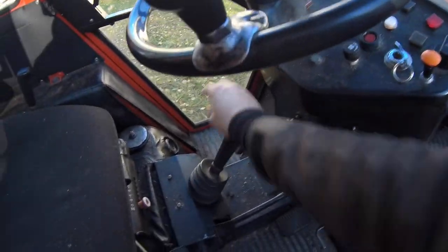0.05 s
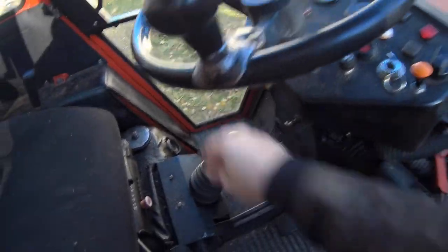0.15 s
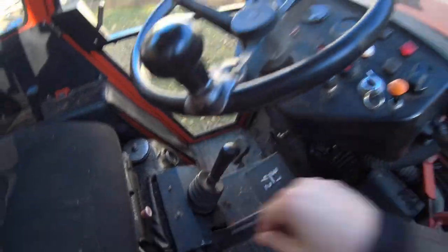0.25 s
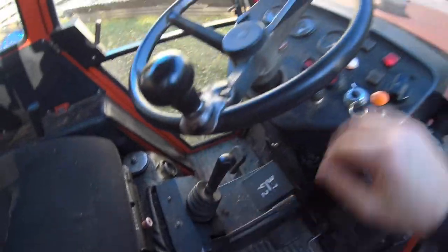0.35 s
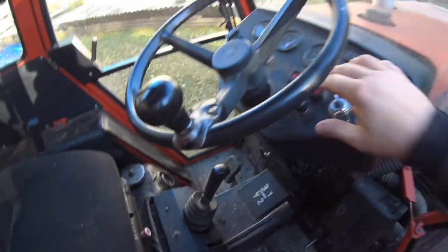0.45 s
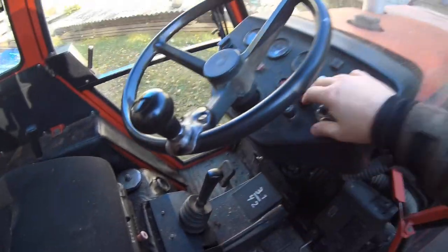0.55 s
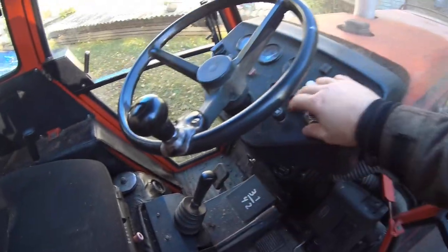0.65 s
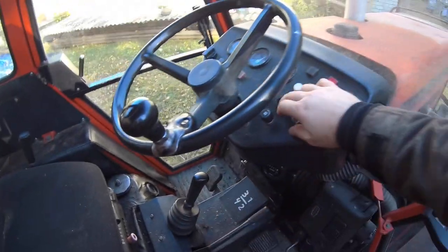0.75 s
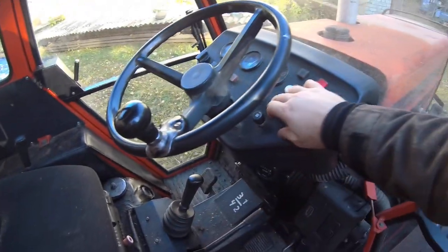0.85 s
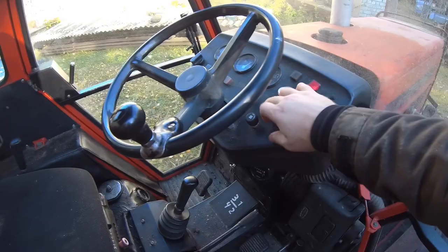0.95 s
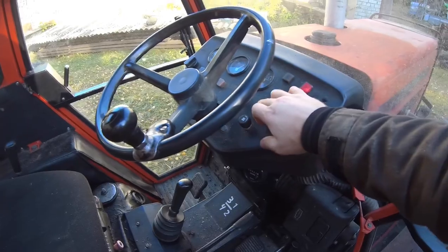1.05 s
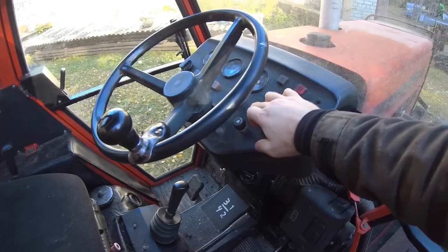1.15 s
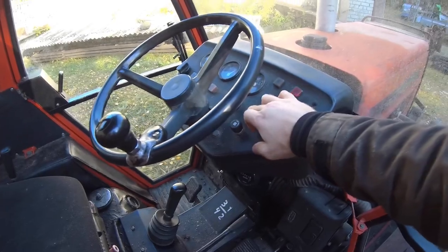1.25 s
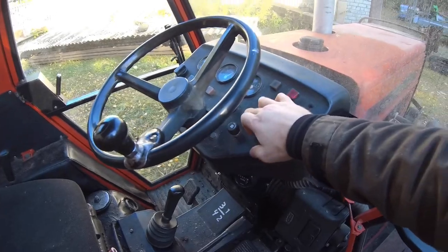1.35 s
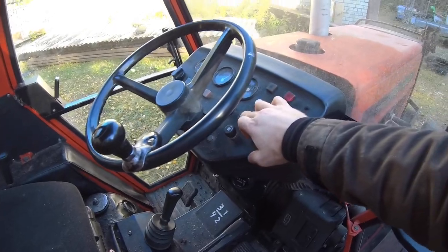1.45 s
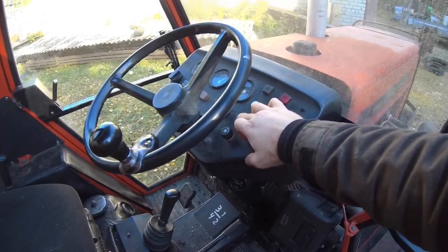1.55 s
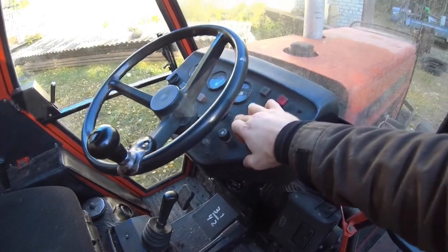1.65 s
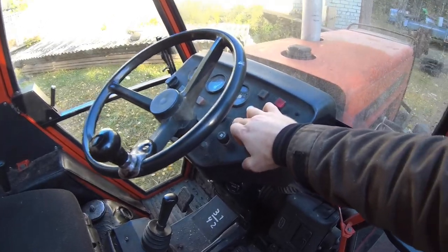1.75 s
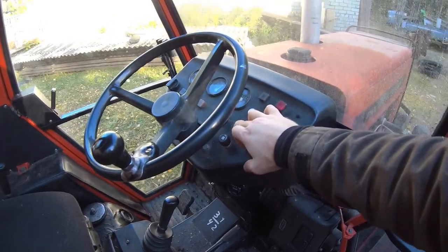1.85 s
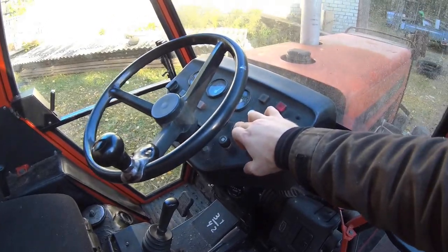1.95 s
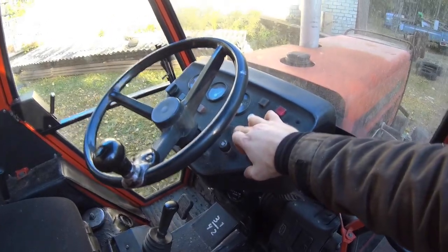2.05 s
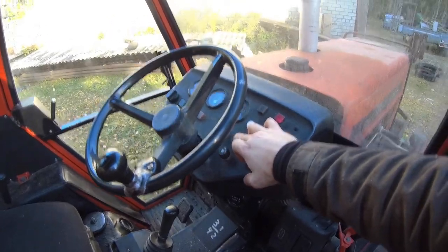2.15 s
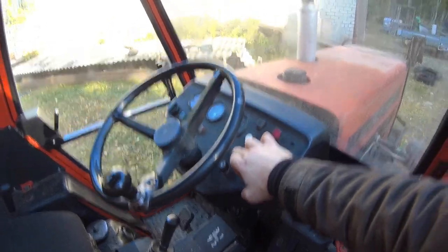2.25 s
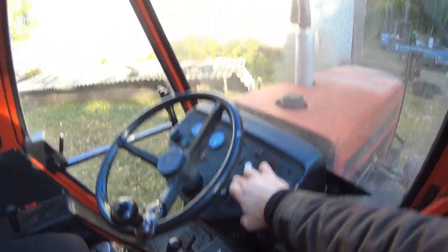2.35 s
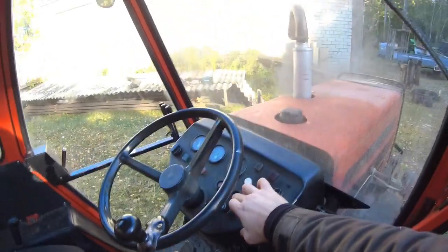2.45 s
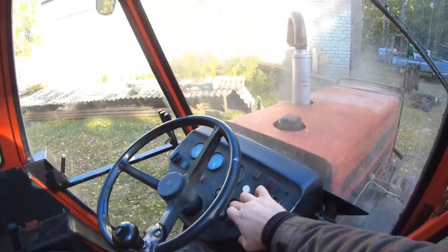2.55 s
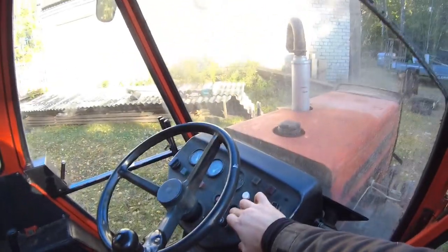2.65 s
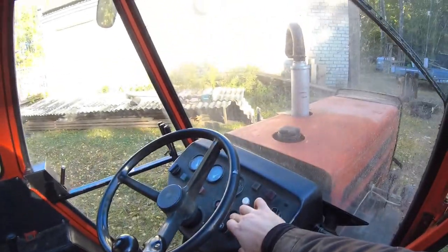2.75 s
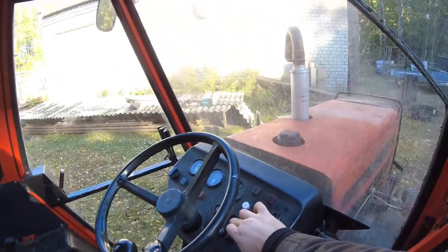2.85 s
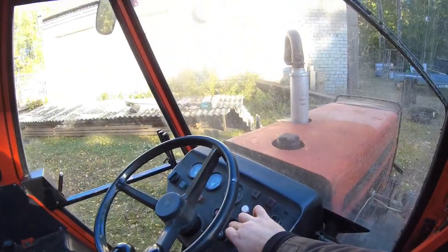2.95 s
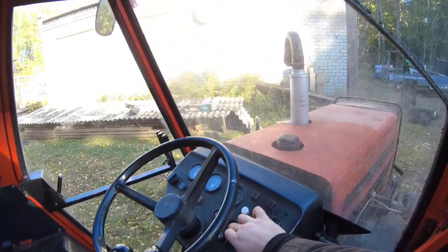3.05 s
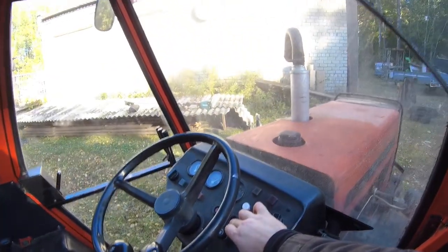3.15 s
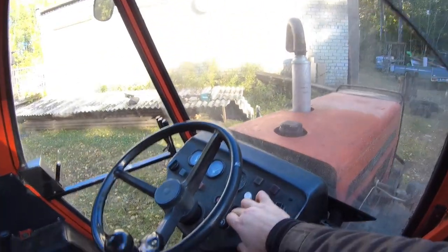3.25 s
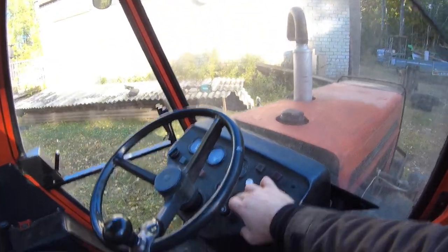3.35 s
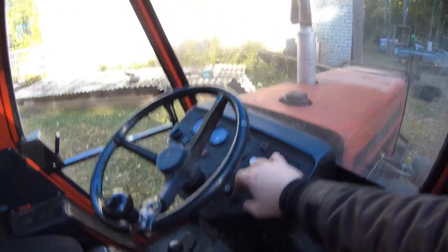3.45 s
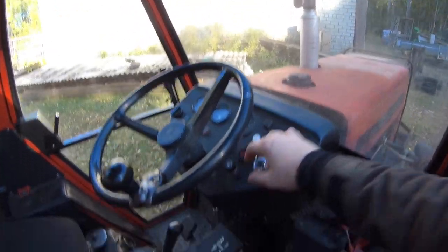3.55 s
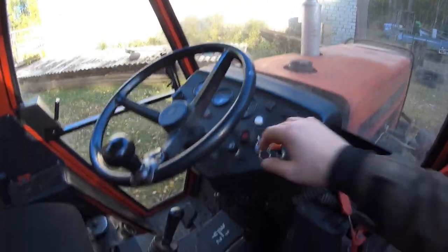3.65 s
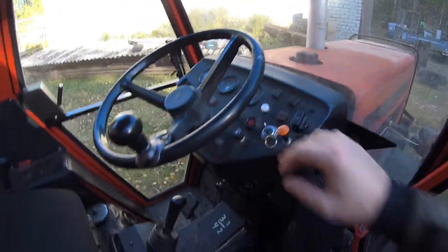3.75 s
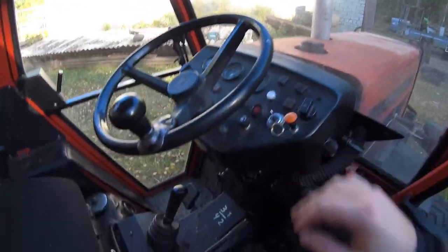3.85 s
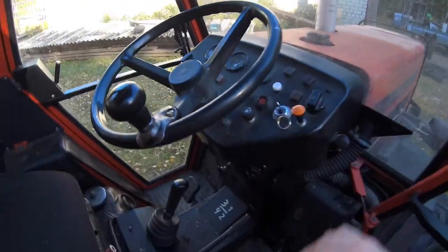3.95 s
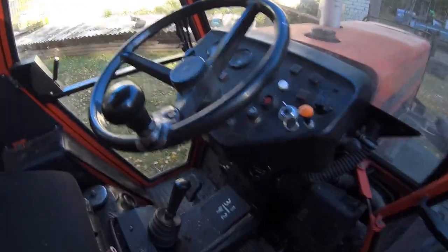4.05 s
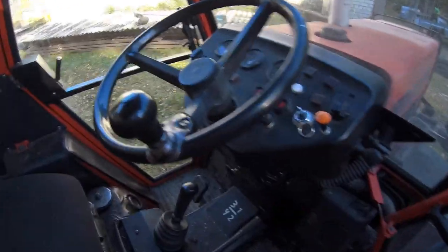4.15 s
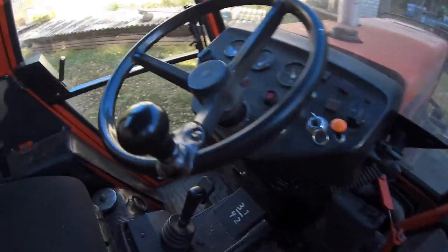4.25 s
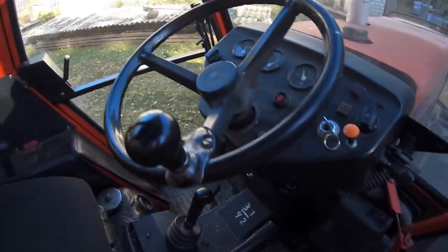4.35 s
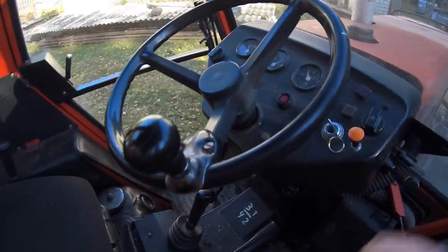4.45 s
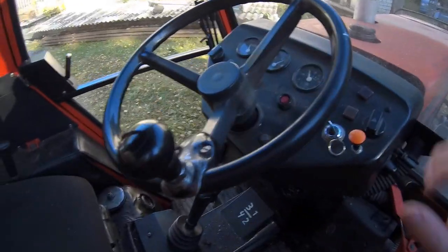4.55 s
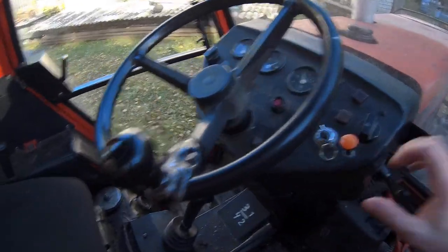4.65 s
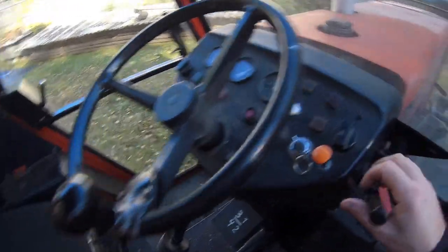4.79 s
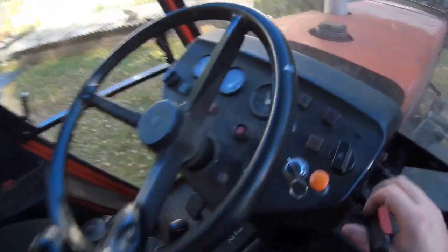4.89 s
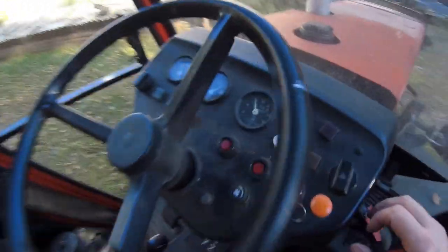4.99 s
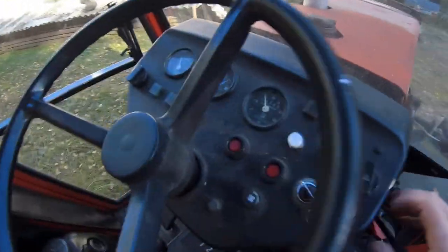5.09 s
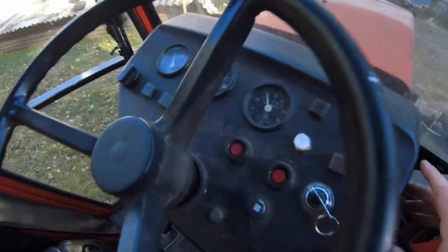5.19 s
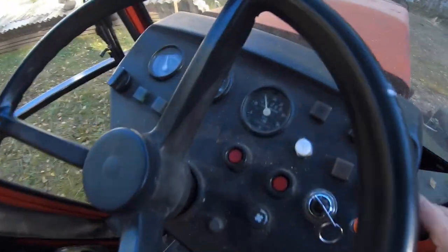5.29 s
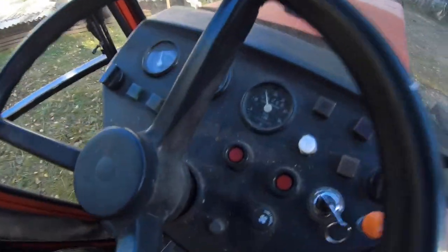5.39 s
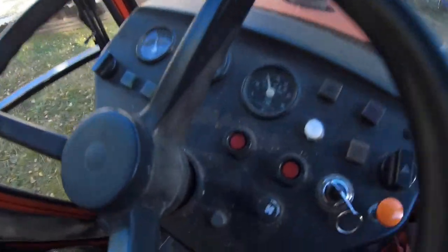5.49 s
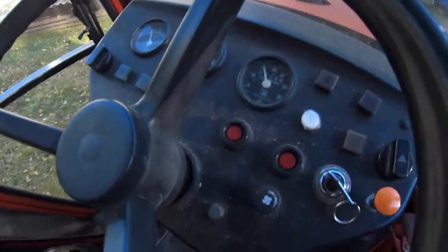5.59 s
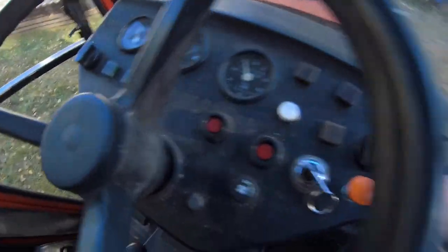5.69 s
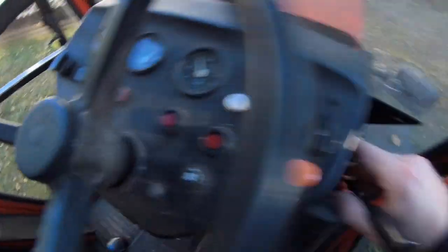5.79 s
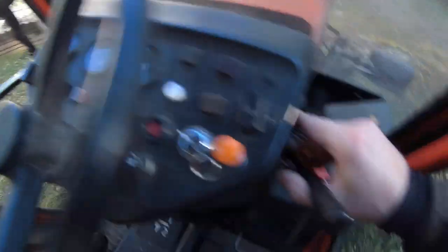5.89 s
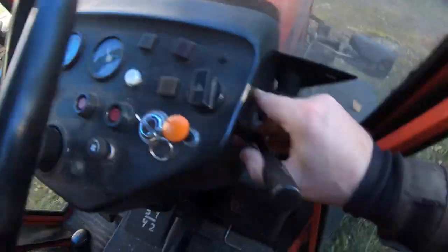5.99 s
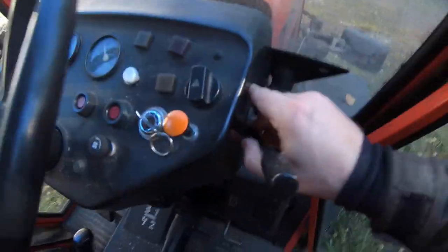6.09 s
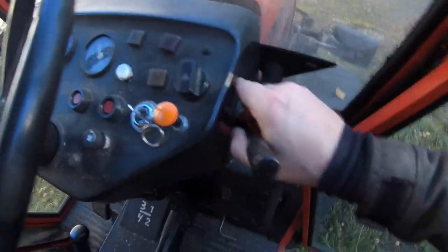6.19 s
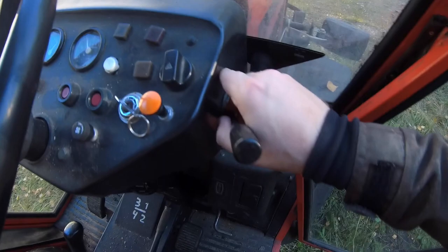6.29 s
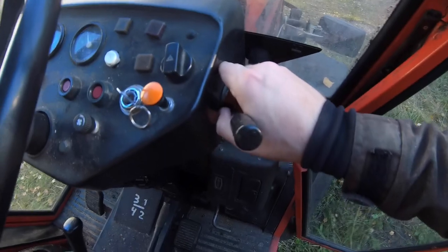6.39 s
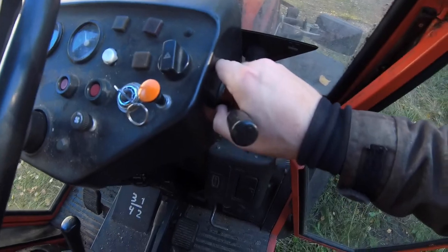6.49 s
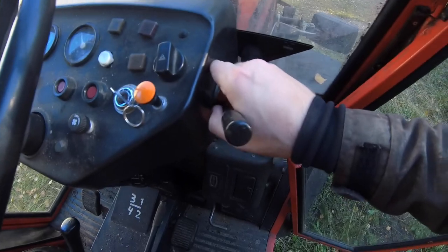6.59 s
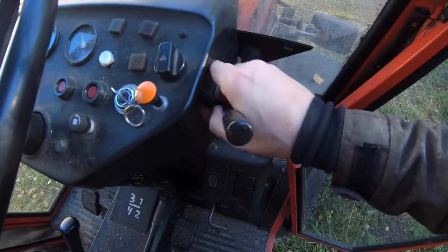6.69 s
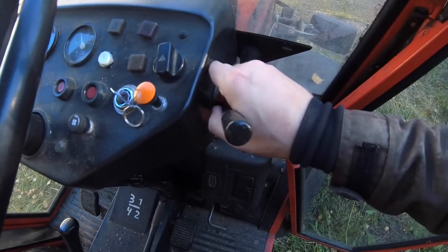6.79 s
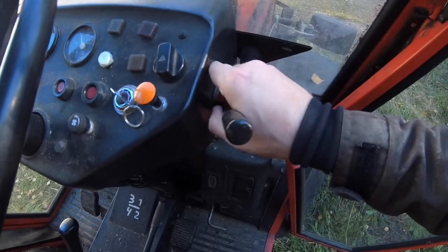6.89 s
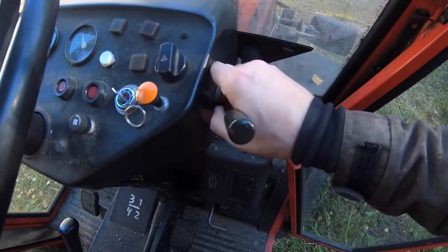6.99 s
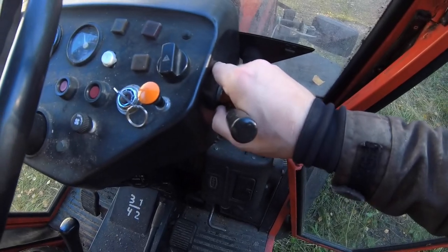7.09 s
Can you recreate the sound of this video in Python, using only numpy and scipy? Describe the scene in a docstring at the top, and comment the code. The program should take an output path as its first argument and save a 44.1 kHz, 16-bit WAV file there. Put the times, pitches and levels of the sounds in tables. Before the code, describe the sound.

A quiet cab with sleeve rustle and small switch clicks gives way to a bright metal clank and rough, pulsing starter grind. Low booms quicken as a three-cylinder diesel fires, very loud and slightly overloaded at the close stereo microphone. Loose panels jolt and gears skid; then the engine settles into a fast, even clatter, hissing and buzzing as a panel sings more strongly.

```python
"""A three-cylinder diesel catches and races up in a small tractor's cab, then settles at a fast governed speed.
The exhaust is a sum of lines locked to the engine cycle; thuds, knock and clatter are noise bursts at each firing,
over a hiss that puffs once a cycle. Before it a hand works the controls, the pinion crashes in and gear-tooth noise
cranks the engine while each stroke booms in the cab. Panels rattle and sing close to the stereo microphone."""
import sys
import numpy as np
from scipy.fft import rfft, irfft, next_fast_len
from scipy.io import wavfile
from scipy.ndimage import map_coordinates

SR = 44100
rng = np.random.default_rng(int(sys.argv[2]) if len(sys.argv) > 2 else 0)


def wrap_up_sound(samples):
    """Save the sound to the file named by the first command line argument, as 16-bit audio."""
    columns = np.atleast_2d(samples).T
    # keep every value between -1 and 1, then stretch to whole-number steps
    tamed = np.clip(columns, -1, 1)
    steps = np.round(tamed * 32767).astype(np.int16)
    wavfile.write(sys.argv[1], SR, steps)


N = 314433
T = np.arange(N) / SR  # s
TOP_HZ = 15780  # upper limit of the final band


def amp(db):
    """Decibels to gain."""
    return 10 ** (np.asarray(db) / 20)


def unit(x):
    """Each row scaled to rms 1."""
    return x / np.sqrt(np.mean(x ** 2, axis=-1, keepdims=True) + 1e-20)


def along(points, hz):
    """Interpolate (Hz, value) points on a log frequency axis."""
    f, v = np.transpose(points)
    return np.interp(np.log(hz + 1), np.log(f + 1), v)


def curve(rows):
    """Interpolate (time, value) rows to one value per sample."""
    s, values = np.transpose(rows)
    return np.interp(T, s, values)


def ramp(start, length):
    """A fade from 0 to 1, in seconds."""
    return np.clip((T - start) / length, 0, 1)


def wobble(rate):
    """A smooth random curve with rate knots a second."""
    knots = rng.standard_normal(int(N * rate / SR) + 4)
    return map_coordinates(knots, [T * rate], order=2)


def noise(length=N):
    """White noise, independent in the middle and side channels."""
    return rng.standard_normal((2, length))


def filtered(x, response):
    """Multiply the spectrum of x by a response of frequency."""
    n = x.shape[-1]
    m = next_fast_len(n + 4096)
    return irfft(rfft(x, m) * response(np.fft.rfftfreq(m, 1 / SR)), m)[..., :n]


def band(x, spectrum, lo_hz, hi_hz):
    """Colour x by a spectrum between two steep edges, at rms 1."""
    def response(hz):
        low_edge = 1 + (lo_hz / (hz + 1)) ** 12
        high_edge = 1 + (hz / hi_hz) ** 12
        return amp(along(spectrum, hz)) * (low_edge * high_edge) ** -.5
    return unit(filtered(x, response))


def add(track, s, sound):
    """Mix a sound into a track from time s."""
    i = max(round(s * SR), 0)
    track[..., i:i + sound.shape[-1]] += sound[..., :max(N - i, 0)]


# Still cab colour: pitch_hz, level_db (relative)
STILL_SPECTRUM = [(15, -37), (25, -6), (59, 2.5), (119, -11), (268, -6), (651, -13), (725, -8), (807, -15),
                  (923, -12), (1280, -15), (1630, -14), (2020, -19), (15600, -28.5)]
RUMBLE_DB, RUSTLE_DB = -52, -51.5
HANDLING_DB, SETTLE_S = 22.5, 0.16  # extra as the arm leaves the lever, and its decay time


def cab():
    """Handling rumble and a rustling sleeve, as shaped noise, settle in the still cab."""
    handling_db = HANDLING_DB * np.exp(-T / SETTLE_S)
    rumble = band(noise(), STILL_SPECTRUM, 25, 440)
    rustle = band(noise(), STILL_SPECTRUM, 410, 19000)
    rustle_db = RUSTLE_DB + .15 * handling_db + wobble(39.6)
    return amp(RUMBLE_DB + handling_db) * rumble + amp(rustle_db) * rustle


def booms(rows):
    """Each shove makes a low tone of the cab's air swell and die away."""
    out = np.zeros(N)
    for s, db, hz, length in rows:
        t = np.arange(int(length * SR)) / SR
        swell = np.sin(np.pi * (t / length) ** 0.5) ** 2
        add(out, s, amp(db) * swell * np.sin(2 * np.pi * hz * t))
    return out


# Soft bumps of the arm: start_s, level_db, pitch_hz, length_s
ARM_BUMPS = [(0.0, -29, 67, 0.044), (0.06, -41, 62, .04), (0.464, -36, 52, 0.041), (0.527, -36, 55, 0.03),
             (.655, -45, 70, .05)]


def arm_bumps():
    """The arm nudges the cab into short, soft low tones."""
    return booms(ARM_BUMPS)


def scrapes(rows, spectrum, lo_hz):
    """Bright rubbing noises that swell quickly and fade."""
    out = np.zeros((2, N))
    for s, db, length in rows:
        u = np.arange(int(length * SR)) / int(length * SR)
        scrape = band(noise(SR), spectrum, lo_hz, TOP_HZ)[:, :len(u)]
        add(out, s, amp(db) * np.sin(np.pi * u ** 0.52) * scrape)
    return out


# Sleeve sliding over the dash: start_s, level_db, length_s
SLEEVE_SWISHES = [(.34, -55, .2), (.56, -55, 0.16)]


def sleeve():
    """Cloth slides over the dash as short strokes of filtered noise."""
    return scrapes(SLEEVE_SWISHES, STILL_SPECTRUM, lo_hz=2800)


# Bright snap of metal contacts: pitch_hz, level_db (relative)
PINION_SPECTRUM = [(59, -49), (100, -5.5), (421, -13), (498, 1), (729, -7), (940, -2.5), (3630, -13.5),
                   (5550, -12), (7150, -21.5), (10000, -18), (15600, -24)]


def hits(rows, ring_spectrum, rise, t60, knock_db, ring_db, snap_db, snap_top_hz):
    """Contacts mix a dull knock, a ring and a bright snap; brightness trades knock for snap."""
    out = np.zeros((2, N))
    t = np.arange(SR // 4) / SR
    envelope = amp(-60 * t / t60) * (1 - np.exp(-t / rise))
    for s, db, bright_db in rows:
        knock = amp(knock_db - .35 * bright_db) * band(noise(len(t)), ring_spectrum, 190, 480)
        ring = amp(ring_db) * band(noise(len(t)), ring_spectrum, 610, 2300)
        snap = amp(snap_db + bright_db) * band(noise(len(t)), PINION_SPECTRUM, 2340, snap_top_hz)
        add(out, s, amp(db) * (knock + ring + snap) * envelope)
    return out


# Lever and switches: start_s, level_db, brightness_db
CONTROL_CLICKS = [(0.004, -32.5, 4), (0.038, -43, -3), (0.117, -40.5, 5), (0.626, -47, 0),
                  (0.764, -33.5, -12)]
# Dash ring: pitch_hz, level_db (relative)
DASH_SPECTRUM = [(120, -55), (200, -21), (389, -21), (438, -34), (554, -4), (938, -4), (1240, -7),
                 (1320, -26), (1410, -4), (1640, -4), (2010, -15), (2600, -26), (3380, -52), (5720, -120)]


def controls():
    """The lever and switches click, ringing the dash."""
    return hits(CONTROL_CLICKS, DASH_SPECTRUM, rise=0.00064, t60=0.085,
                knock_db=-11, ring_db=5, snap_db=-4, snap_top_hz=9350)


def key():
    """Two high partials ping thinly as the ignition key is turned."""
    out = np.zeros((2, N))
    t = np.arange(SR // 6) / SR
    long_partial = np.sin(2 * np.pi * 7850 * t)
    short_partial = np.sin(2 * np.pi * 8300 * t) * np.exp(-t / .01)
    add(out, 1.069, amp(-47 - 60 * t / .13) * (long_partial + short_partial))
    return out


# Pinion against the ring gear: start_s, level_db, brightness_db
PINION_HITS = [(1.08, -40.5, -26), (1.097, -36, 0), (1.107, -33, 4), (1.117, -26, 5.5), (1.134, -22, -0.5),
               (1.143, -24.5, -13), (2.007, -30, 0), (2.015, -27.5, -22)]


def pinion():
    """The solenoid pulls in and the pinion strikes the ring gear with bright metal contacts."""
    return hits(PINION_HITS, PINION_SPECTRUM, rise=0.0016, t60=0.092,
                knock_db=-1, ring_db=4.5, snap_db=3.0, snap_top_hz=16000)


# Slow first strokes that shake the cab: start_s, level_db, pitch_hz, length_s
STROKES = [(1.173, -19, 61.7, 0.1), (1.48, -19, 59.5, 0.15), (1.682, -19.5, 58, 0.17),
           (1.89, -21.5, 59, 0.14), (2.028, -13, 59.7, 0.15), (2.136, -6.5, 61, 0.13),
           (2.207, -3, 60.2, 0.2), (2.328, -2, 66, 0.3)]
CRANK_STROKES = 4
LAST_STROKE_S = .23  # the stroke in which the engine catches


def stroke_booms():
    """Slow compressions shove the cab's air into low booms."""
    return booms(STROKES)


def stroke_starts():
    """Start times of the cranking strokes, then the end of the last one."""
    starts = [row[0] for row in STROKES[:CRANK_STROKES]]
    return np.array(starts + [starts[-1] + LAST_STROKE_S])


def surge(stroke, depth, peak):
    """A gain that swells and sags once a stroke; peak is a share of the stroke."""
    return 1 + np.clip(depth, 0, 1) * np.cos(2 * np.pi * (stroke - peak))


# Starter colour: pitch_hz, level_db (relative)
STARTER_SPECTRUM = [(59, -44), (100, 17), (253, -2.5), (395, 9), (430, 3.5), (603, 7.5), (882, 5.5),
                    (960, -10), (1240, 2.5), (2140, -17.5), (3270, -25.5), (5430, -22.5), (7610, -35),
                    (11900, -37.5), (15600, -43)]
# Starter and bell housing resonances: pitch_hz, width_hz, level_db (relative)
HOUSING = [(259, 73, -1), (966, 64, 3), (1694, 64, -9.5), (2125, 37, -3)]
GROWL_DB, GROWL_SURGE, GROWL_PEAK = -30, 0.35, 0.21  # level, depth (0-1), share of stroke
RASP_DB, RASP_SURGE, RASP_PEAK = -42.5, 0.23, .06  # the same three; level at the first stroke
RASP_DB_PER_S = 7


def housing_response(f):
    """Sum the housing's resonances with alternating sign."""
    total = 0
    for k, (center, width, db) in enumerate(HOUSING):
        damping = 1j * f * width
        total = total + (-1) ** k * amp(db) * damping / (center * center - f * f + damping)
    return total


def starter():
    """Gear teeth grind and whine through the housing, their rate and strain varying once a stroke."""
    starts = stroke_starts()
    stroke = np.interp(T, starts, np.arange(len(starts)))
    growl_gain = amp(GROWL_DB) * surge(stroke, GROWL_SURGE, GROWL_PEAK)
    rasp_gain = amp(RASP_DB + RASP_DB_PER_S * (T - starts[0])) * surge(stroke, RASP_SURGE, RASP_PEAK)
    tooth_rate = 330 * (1 + .16 * np.cos(2 * np.pi * stroke) + .015 * wobble(40))
    teeth = np.cumsum(tooth_rate) / SR
    mesh = unit(np.exp(-(teeth % 1) / 0.88))
    grind = mesh * noise() + 0.23 * unit(np.diff(mesh, prepend=0))
    # teeth press hardest during compression
    strain_db = 3 * np.cos(2 * np.pi * (stroke - .25)) + 2 * wobble(18)
    ring = unit(amp(strain_db) * filtered(grind, housing_response))
    growl = amp(-4.5) * band(grind[::-1], STARTER_SPECTRUM, 155, 2100) + amp(-3.5) * ring
    whine = unit(sum(np.sin(2 * np.pi * k * teeth) / k for k in (8, 9, 11, 14)))
    rasp = band(grind, STARTER_SPECTRUM, 2080, 14500) + amp(-12) * whine
    shake = amp(-39) * band(noise(), STILL_SPECTRUM, 35, 86)
    cranking = ramp(1.135, 0.021) * (1 - ramp(2.107, 0.12))
    return cranking * (growl_gain * growl + rasp_gain * rasp + shake)


BACKLASH_AT, BACKLASH_DB = .74, -39  # share of the stroke, level


def backlash():
    """Past each compression the engine runs ahead of the starter and the gear teeth slap over."""
    starts = stroke_starts()[:-1]
    rows = [(s, BACKLASH_DB, 0) for s in starts[:-1] + BACKLASH_AT * np.diff(starts)]
    return hits(rows, STARTER_SPECTRUM, rise=.003, t60=0.23,
                knock_db=-11, ring_db=5, snap_db=0, snap_top_hz=13000)


# Overrun pinion skidding on the ring gear: start_s, level_db, length_s
PINION_SKIDS = [(2.244, -32, .09), (2.335, -26.5, 0.28), (2.767, -30.5, .15)]
# Treble of skids, valve gear and hiss: pitch_hz, level_db (relative)
CLATTER_SPECTRUM = [(1290, -33), (2200, 10), (2470, -4), (3290, -11), (4240, -11), (8580, -22),
                    (12200, -19), (14400, -24), (15600, -24)]


def skids():
    """The overrun pinion skids on the ring gear as bright rubbing noise."""
    return scrapes(PINION_SKIDS, CLATTER_SPECTRUM, lo_hz=4520)


# Body of the cab under light load: pitch_hz, level_db (relative)
BODY_SPECTRUM = [(110, -12), (200, -9.5), (235, -8.5), (270, 1), (335, 4.5), (370, -1), (420, -3.5),
                 (500, -6), (560, 0), (640, -6.5), (690, -11.5), (1000, 0)]
HUM_DB, HUM_RACING_DB = -19.5, 7  # level, and extra while the engine races
HUM_CALMS_AT, RELEASE_AT = 2.85, 3.6  # s; the key is let go at the second


def freewheel():
    """The overrun starter hums roughly, as narrow noise, and shakes the floor until released."""
    level_db = HUM_DB + HUM_RACING_DB * (1 - ramp(HUM_CALMS_AT, .07))
    hum = band(noise(), BODY_SPECTRUM, 243, 240)  # crossed edges leave a narrow band
    shake = band(noise(), BODY_SPECTRUM, 58, 63)
    shake = shake + amp(-3) * band(noise(), BODY_SPECTRUM, 94, 113)
    gate = ramp(2.49, 0.061) * (1 - ramp(RELEASE_AT, .08))
    return gate * amp(level_db) * (amp(-3.0) * hum + amp(-5.0) * shake)


# Loose panels jolted by hard firings: start_s, level_db, brightness_db
PANEL_RATTLES = [(2.088, -19, 10.5), (2.182, -15.5, 7), (2.207, -10.5, -6), (2.258, -21, 14),
                 (2.358, -11, 6), (2.38, -7.5, -1), (2.491, -7.5, 4), (2.548, -16, 0), (2.59, -12, -1),
                 (2.624, -9, 3), (2.704, -23, -6), (2.856, -10, -6)]
# Cab and engine under hard load: pitch_hz, level_db (relative)
RACING_SPECTRUM = [(71, -11), (120, -13.5), (184, 1.5), (232, -10), (274, -1.5), (375, -15), (419, -6.5),
                   (551, -9.5), (607, -9), (767, -8.5), (917, -6.5), (1220, -7), (1400, -14.5), (2370, -15),
                   (3200, -23), (4160, -57), (7040, -120)]


def rattles():
    """Hard firings jolt loose panels into short metal contacts."""
    return hits(PANEL_RATTLES, RACING_SPECTRUM, rise=0.00086, t60=0.092,
                knock_db=-3.5, ring_db=-2, snap_db=-17.5, snap_top_hz=9000)


# Engine speed once it runs: time_s, firings_per_s
SPEED = [(2.0, 8), (2.2, 13), (2.35, 20), (2.48, 27.5), (2.56, 30), (2.65, 34.6), (2.75, 37), (2.85, 38.1),
         (3.05, 37.59), (7.13, 37.59)]
FIRST_CYLINDER_AT = 3.030  # s, zero of the firing count


def firing_count():
    """Integrate speed to firings elapsed; three of them make one engine cycle."""
    count = np.cumsum(curve(SPEED)) / SR
    return count - np.interp(FIRST_CYLINDER_AT, T, count)


def firings(count):
    """Sample index and cylinder number (0-2) of each firing."""
    for i in np.flatnonzero(np.diff(np.floor(count))):
        yield i, int(np.floor(count[i + 1])) % 3


def blows(count, cylinder_db, lag, rise, t60, alike, bed_db, scatter_db):
    """One swelling, dying burst per firing over a steady bed; each cylinder repeats part of its own ring."""
    t = np.arange(SR // 12) / SR
    alike = np.clip(alike, 0, 1)
    own = rng.standard_normal((3, 2, len(t)))
    decay = amp(-60 * t / t60) * (1 - np.exp(-t / rise))
    out = np.zeros((2, N))
    for i, k in firings(count):
        ring = np.sqrt(alike) * own[k] + np.sqrt(1 - alike) * noise(len(t))
        add(out, T[i] + lag, amp(cylinder_db[k] + scatter_db * rng.normal()) * decay * ring)
    return unit(out) + amp(bed_db) * noise()


# Singing panel: time_s, level_db (before the mix of line and shaking)
PANEL_LEVEL = [(2.7, -27), (3.8, -25.5), (4.45, -20.5), (5.0, -17.5), (5.45, -18.5), (5.92, -19.5),
               (6.1, -21.5), (7.13, -20)]


def panel(count):
    """Every firing shakes a cab panel near 600 Hz; driven hard it sings with the sixteenth firing harmonic."""
    panel_db = curve(PANEL_LEVEL)
    singing_db = np.minimum(.5 * (panel_db + 18), 0)
    phase = 16 * 2 * np.pi * count + .6 * wobble(14)
    line = amp(singing_db - .8 + 1.6 * wobble(12)) * np.cos(phase)
    shaken = blows(count, [2, 0, 0], lag=0.002126, rise=0.0012, t60=0.54,
                   alike=0.26, bed_db=-2.5, scatter_db=2)
    shaken = band(shaken, BODY_SPECTRUM, 610, 613)
    middle_only = [[1], [0]]
    return ramp(1.925, 0.17) * amp(panel_db) * (amp(2.0) * line * middle_only + amp(-5.5) * shaken)


# Engine load, high while racing up until the governor cuts back: time_s, load (0-1)
LOAD = [(2.06, .25), (2.22, 0.75), (2.5, 0.98), (2.64, 0.69), (2.85, 0.35), (3.5, 0.3), (3.75, 0.36),
        (4.3, .24)]
LIGHT_LOAD, GOVERNED_RATE = .24, 37.59  # load (0-1), firings per second


def speed_and_load():
    """Engine speed in doublings from the governed speed, and load."""
    return np.log2(curve(SPEED) / GOVERNED_RATE), np.clip(curve(LOAD), 0, 1)


def effort_db(law):
    """An engine layer's level follows load and speed."""
    governed_db, load_db, speed_db = law
    doublings, load = speed_and_load()
    return governed_db + load_db * (load - LIGHT_LOAD) + speed_db * doublings


CATCH_AT = 2.05  # s, combustion takes hold
# Hiss law: governed_db, db_per_unit_load, db_per_doubling_of_speed (before the mix of its parts)
HISS_LAW = (-39, 9.9, 1.8)


def hiss(count):
    """A steady noise hiss, with a thin puff on top once in each engine cycle."""
    steady = band(noise(), CLATTER_SPECTRUM, 6300, 15800)
    age = (count + .3) % 3  # firings since the last puff began
    opening = unit((1 - np.exp(-age / .05)) * np.exp(-age / .36))
    jet = band(noise(), CLATTER_SPECTRUM, 12000, 14200)
    jet = jet + amp(-7) * band(noise(), CLATTER_SPECTRUM, 7000, 16000)
    puffs = ramp(1.7, 2.5) * opening * jet
    return ramp(CATCH_AT, 0.083) * amp(effort_db(HISS_LAW)) * (amp(0.9) * steady + amp(-5.0) * puffs)


# Exhaust lines; every third order is a firing harmonic: order (of the cycle rate), level_db (relative)
EXHAUST_LINES = [(3, -8.5), (4, -13), (5, -11.5), (6, -4), (9, -22.5), (11, -34), (12, -2), (13, -13),
                 (14, -12.5), (15, -1), (16, -12.5), (17, -14), (21, -18), (24, -19.5), (27, -19),
                 (32, -17.5), (33, -17.5), (36, -21.5), (51, -20.5)]
# Cab boom, loud in the race up, then varying as the microphone moves: time_s, level_db
BOOM_LEVEL = [(2.71, -3), (2.82, -14.5), (3.25, -18.5), (4.0, -15.5), (4.55, -15), (5.55, -15.5),
              (6.3, -17), (7.13, -16.5)]
GOVERNOR_AT, GOVERNOR_S = 2.75, 0.083  # time and fade, s
BOOM_AT, DRONE_AT = 2.455, 2.6  # s
DRONE_DB = -13  # before the lean
LEAN_AT, LEAN_S, LEAN_DB = 4.82, 0.12, 3  # drone swells as the microphone moves down to the dash


def exhaust(count):
    """Firing pulses sound as lines of the cycle rate; the low ones boom in the cab, the others drone."""
    governed = ramp(GOVERNOR_AT, GOVERNOR_S)
    angle = 2 * np.pi * (count + 0.0017 * wobble(20)) / 3
    boom, drone = np.zeros(N), np.zeros(N)
    for order, db in EXHAUST_LINES:
        order = round(order)
        # low firing harmonics peak together; cylinder differences and higher lines fall anywhere
        together = order % 3 == 0 and order < 16
        phase = rng.uniform(0, 2 * np.pi) * (not together)
        flicker_db = (.5 if together else 2.2) * wobble(7)
        line = amp(db + flicker_db) * np.cos(order * angle + phase)
        if order == 6:  # second firing harmonic, full from the start
            boom += line
        elif order < 8:
            boom += line * (.15 + .85 * governed)
        else:
            drone += line
    steady = slice(3 * SR, N)
    boom *= amp(curve(BOOM_LEVEL)) / boom[steady].std()
    drone *= amp(DRONE_DB + LEAN_DB * ramp(LEAN_AT, LEAN_S)) / drone[steady].std()
    return ramp(BOOM_AT, 0.028) * boom + ramp(DRONE_AT, 0.15) * drone


# Ringing of the engine block: pitch_hz, level_db (before scatter)
BLOCK_MODES = [(752, 2.5), (850, 3), (945, -30), (980, 4.5), (1180, 6.5), (1245, -1), (1340, 2.5),
               (1560, -0.5), (1665, 4), (1725, 4), (2056, -4.5), (2240, -7.5), (2606, -5.5)]


def block_ring(count, cylinder_db, lag, t60, scatter_db, mode_scatter_db):
    """Each ignition strikes the block and wakes its modes at new strengths."""
    hz, db = np.transpose(BLOCK_MODES)
    t = np.arange(SR // 8) / SR
    envelope = amp(-60 * t / t60) * (1 - np.exp(-t / 0.00034))
    modes = np.exp(2j * np.pi * np.outer(hz, t)) * envelope
    out = np.zeros((2, N))
    for i, k in firings(count):
        mode_gain = amp(db + mode_scatter_db * rng.uniform(-1.6, 1, len(hz)))
        strength = mode_gain * np.exp(2j * np.pi * rng.random((2, len(hz))))
        blow_gain = amp(cylinder_db[k] + scatter_db * rng.uniform(-1.26, 1))
        add(out, T[i] + lag, blow_gain * (strength @ modes).real)
    return unit(out)


def voiced(x, light, lo_hz, hi_hz, load_db):
    """Hard combustion under load rings other panels than light running does."""
    _, load = speed_and_load()
    hard = amp(load_db) * band(x, RACING_SPECTRUM, lo_hz, hi_hz)
    return load * hard + (1 - load) * band(x, light, lo_hz, hi_hz)


# Valve gear law: governed_db, db_per_unit_load, db_per_doubling_of_speed
CLATTER_LAW = (-33.5, 10.8, 1.9)


def clatter(count):
    """Valve gear ticks brightly around each firing."""
    ticks = blows(count, [1.5, -1.5, 0], lag=-.002, rise=0.00045, t60=0.16,
                  alike=0.22, bed_db=2.0, scatter_db=3.0)
    return amp(effort_db(CLATTER_LAW)) * band(ticks, CLATTER_SPECTRUM, 2930, 5900)


# Knock under light load: pitch_hz, level_db (relative)
KNOCK_SPECTRUM = [(320, -40), (550, -5), (609, 0.5), (680, -8.5), (834, -5.5), (1010, -10.5), (1100, -15),
                  (1200, -13), (1360, -10), (1650, -7.5), (1800, -11), (2210, -15), (2470, -25.5),
                  (3250, -21.5), (3600, -23), (4680, -59), (7920, -120)]
# Knock law: governed_db, db_per_unit_load, db_per_doubling_of_speed (before the mix of its parts)
KNOCK_LAW = (-20.5, 9.8, 3.6)


def knock(count):
    """Burning charges, slapping pistons and the ringing block make the diesel knock."""
    burns = blows(count, [2, -1.5, -.5], lag=-0.00049, rise=0.0003, t60=0.19,
                  alike=0.12, bed_db=-1.5, scatter_db=2.6)
    # pistons cross over
    slaps = blows(count, [2, -2, 0], lag=.0095, rise=.001, t60=0.12,
                  alike=0.37, bed_db=-2.5, scatter_db=1.5)
    ring = block_ring(count, [3, -2, 0], lag=0.001974, t60=0.13, scatter_db=3.0, mode_scatter_db=10)
    strokes = voiced(burns + amp(-4.0) * slaps, KNOCK_SPECTRUM, 760, 2870, load_db=1.5)
    return amp(effort_db(KNOCK_LAW)) * (amp(-1) * strokes + amp(-8.0) * ring)


# Thud law: governed_db, db_per_unit_load, db_per_doubling_of_speed
BODY_LAW = (-21, 5.1, 2.1)


def body(count):
    """Combustion thuds through the cab as low noise bursts."""
    thuds = blows(count, [2, 0, -1], lag=-.001, rise=0.00072, t60=0.22,
                  alike=0.52, bed_db=-6.0, scatter_db=1.2)
    return amp(effort_db(BODY_LAW)) * voiced(thuds, BODY_SPECTRUM, 70, 776, load_db=5.5)


def engine(count):
    """Thuds, knock and valve clatter start together when combustion takes hold."""
    return ramp(CATCH_AT, 0.014) * (body(count) + knock(count) + clatter(count))


# Width of the cab sound: pitch_hz, side_minus_mid_db (relative gain)
SIDE_DB = [(60, -30), (200, -20), (700, -26.5), (1300, -18), (2400, -2.5), (4400, -1), (15000, 0.5)]
# Balance of the microphone's ports: pitch_hz, left_minus_right_db
LEFT_DB = [(60, -0.6), (200, -0.8), (700, -1), (1290, -2.5), (2400, 1.5), (4400, 1), (8000, 4),
           (15000, 2.5)]
LEFT_LEAD = .00007  # s


def ports(hz):
    """Left and right responses share the level difference and the lead equally."""
    gain = amp(np.outer([.5, -.5], along(LEFT_DB, hz)))
    return gain * np.exp(np.outer([1j, -1j], np.pi * hz * LEFT_LEAD))


def scene():
    """Bass fills the cab alike for both ports; the treble arrives from all sides."""
    count = firing_count()
    hand = controls() + key() + sleeve()
    gears = starter() + pinion() + backlash() + skids() + freewheel()
    running = engine(count) + panel(count) + hiss(count) + rattles()
    mid, side = cab() + hand + gears + running
    mid = mid + exhaust(count) + stroke_booms() + arm_bumps()
    side = filtered(side, lambda hz: amp(along(SIDE_DB, hz)))
    return filtered(np.array([mid + side, mid - side]), ports)


def record(dry):
    """The microphone overloads softly on loud peaks; then a brick-wall cut removes all from TOP_HZ up."""
    top, hardness = .97, 8
    driven = amp(-0.12) * dry
    clipped = driven / (1 + np.abs(driven / top) ** hardness) ** (1 / hardness)
    return filtered(clipped, lambda hz: hz < TOP_HZ)


dry = scene()
out = record(dry)
wrap_up_sound(out)
```